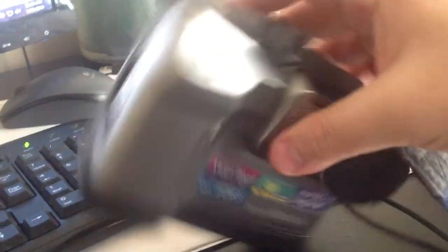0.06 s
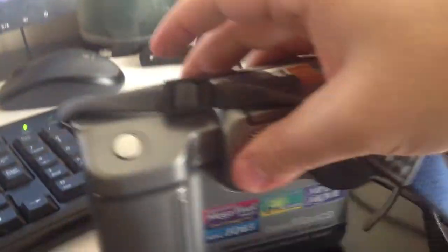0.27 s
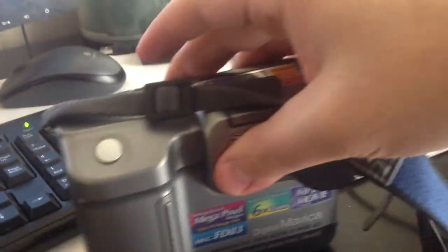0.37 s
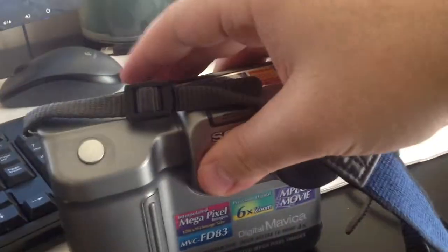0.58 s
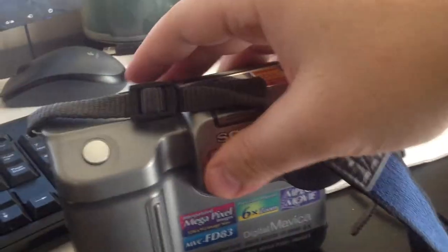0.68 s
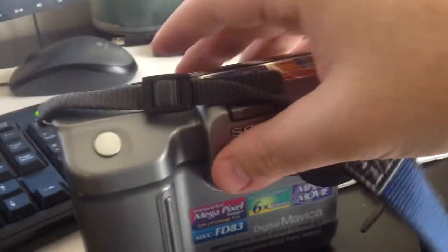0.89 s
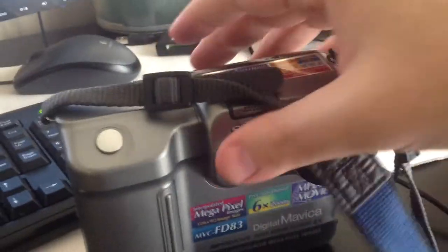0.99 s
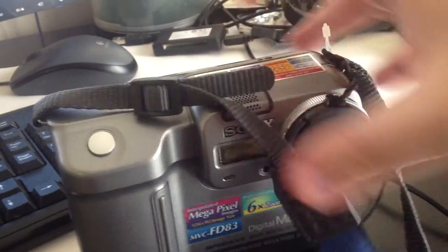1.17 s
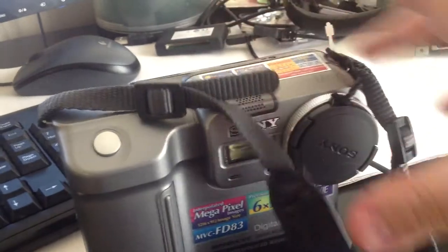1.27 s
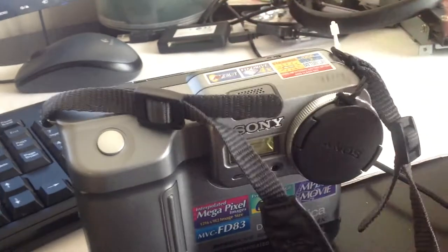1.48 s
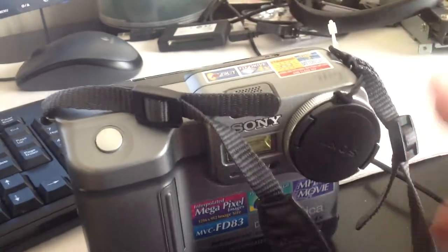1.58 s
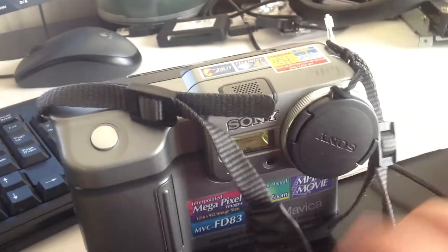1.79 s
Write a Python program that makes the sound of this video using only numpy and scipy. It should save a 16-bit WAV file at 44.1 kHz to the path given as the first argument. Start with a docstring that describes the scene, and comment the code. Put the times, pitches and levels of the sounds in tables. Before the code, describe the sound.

Sharp knocks of a plastic camera set on a desk, followed by faint buckle ticks.

```python
"""A small plastic camera is set down on a desk in a quiet room, close to the microphone.
It brushes the desk, lands with a sharp knock, rocks onto its other edge and settles.
Each contact cracks and rings the case; the desk top booms under each blow.
Strap and buckles then tick faintly against the case as the hand lets go.
Behind it: a fading hiss, a short room echo, steady room noise and a faint hum."""
import sys
import numpy as np
from scipy import signal
from scipy.fft import rfft, irfft
from scipy.io import wavfile
from scipy.ndimage import uniform_filter1d

SR = 44100
rng = np.random.default_rng(int(sys.argv[2]) if len(sys.argv) > 2 else 0)


def wav_out(sig):
    """Save sig, one row per channel (or a flat mono array), as 16-bit PCM at SR to the path in sys.argv[1]."""
    wavfile.write(sys.argv[1], SR, np.round(np.clip(np.atleast_2d(sig).T, -1, 1) * 32767).astype(np.int16))


N = 81585

# Spectrum of a hard contact on the case: freq_hz, gain_db
CRACK_SPECTRUM = [(100, -39.5), (500, -4.5), (1000, 3), (2000, 4), (2700, 5), (3800, 1), (6000, 2.5),
                  (11000, 2), (13000, -3.5), (15000, 0.5)]


def amp(db):
    """Decibels to gain."""
    return 10 ** (np.asarray(db) / 20)


def unit(x):
    """Scale to rms 1."""
    return x / np.sqrt(np.mean(x ** 2) + 1e-20)


def read(points, hz):
    """Interpolate (freq_hz, value) rows on a log-frequency axis."""
    freq_hz, value = np.transpose(points)
    return np.interp(np.log(hz + 1), np.log(freq_hz + 1), value)


def fade(t, t60_s):
    """Exponential decay, 60 dB in t60_s."""
    return np.exp(-np.log(1000) * t / t60_s)


def add(mix, start_s, sound):
    """Mix a sound in at start_s."""
    part = mix[max(round(start_s * SR), 0):][:len(sound)]
    part += sound[:len(part)]


def noise(spectrum, size, tilt_db_per_oct=0):
    """Shaped noise of rms 1; the tilt acts above 1 kHz."""
    hz = np.fft.rfftfreq(size, 1 / SR)
    gain_db = read(spectrum, hz) + tilt_db_per_oct * np.log2(np.maximum(hz, 1000))
    return unit(irfft(rfft(rng.standard_normal(size)) * amp(gain_db), size))


def tint(x, spectrum, size=1024):
    """Minimum-phase filter with the given spectrum."""
    hz = abs(np.fft.fftfreq(size, 1 / SR))
    log_gain = np.log(amp(read(spectrum, hz)))
    taps = np.fft.ifft(np.exp(np.conj(signal.hilbert(log_gain)))).real
    return signal.fftconvolve(x, taps[:size // 2])[:len(x)]


def ring(modes, t, ratio=1):
    """Decaying modes of a struck body; with ratio < 0, neighbours swing against each other."""
    return sum(ratio ** k * amp(db) * fade(t, t60_s) * np.cos(2 * np.pi * hz * t)
               for k, (hz, db, t60_s) in enumerate(modes))


def room_tone(noise_db=-57):
    """Steady room noise and the faint hum of desk equipment."""
    # Room noise spectrum: freq_hz, gain_db
    spectrum = [(30, -9.5), (90, -11), (150, -9), (190, -3.5), (300, -4.5), (650, -15.5), (2900, -28.5),
                (4100, -30.5), (7600, -31), (12600, -32), (15500, -33.5)]
    # Hum tones: pitch_hz, level_db
    tones = [(120, -67), (150, -63.5)]
    t = np.arange(N) / SR
    hum = sum(amp(db) * np.sqrt(2) * np.sin(2 * np.pi * (hz * t + rng.random())) for hz, db in tones)
    return amp(noise_db) * noise(spectrum, N) + hum


def room_echo(x, delay_s=0.00337, build_s=0.0034):
    """Diffuse echo; each band decays at its own rate."""
    # Echo bands: freq_hz, level_db, t60_s
    bands = np.array([(99.4, -15, 1), (213, 0, 0.49), (400, 4.5, 0.49), (800, 1.5, 0.57), (2000, -7, 0.67),
                      (5000, -6, 0.61), (10000, -15, 0.6), (15500, -12, 0.31)])
    hz, frame_s, spectra = signal.stft(rng.standard_normal(SR), SR, nperseg=512)
    level_db = read(bands[:, [0, 1]], hz)[:, None]
    t60_s = read(bands[:, [0, 2]], hz)[:, None]
    energy_norm = np.sqrt(2 * np.log(1000) / (t60_s * SR))
    tail = signal.istft(spectra * amp(level_db) * fade(frame_s, t60_s) * energy_norm, SR)[1][:SR]
    onset = np.clip((np.arange(SR) / SR - delay_s) / build_s, 0, 1)
    return signal.fftconvolve(x, tail * onset)[:N]


def low_swell(peak_s=1.438, width_s=0.16, level_db=-56):
    """Soft low noise rises and sinks once while the hand draws away."""
    # Swell spectrum: freq_hz, gain_db
    spectrum = [(100, -13), (220, -13), (310, 4), (450, -10), (800, -24.5), (3000, -48), (15000, -57)]
    envelope = np.exp(-((np.arange(N) / SR - peak_s) / width_s) ** 2)
    return amp(level_db) * noise(spectrum, N) * envelope


def opening_hiss(hold_s=0.08, decay_s=0.1, level_db=-57):
    """A soft hiss at the start holds briefly, then fades into the room noise."""
    # Hiss spectrum: freq_hz, gain_db
    spectrum = [(60, -50), (200, 4.5), (600, -1), (1500, 3.5), (4000, -3), (10000, -4), (16000, -4)]
    envelope = np.exp(-np.maximum(np.arange(N) / SR - hold_s, 0) / decay_s)
    return amp(level_db) * noise(spectrum, N) * envelope


def rubs(rise_s=0.003, grain_depth=0.4):
    """Short, grainy friction of hand, case and strap."""
    # Friction strokes: start_s, length_s, level_db, tilt_db_per_oct
    strokes = [(.062, 0.033, -47, -11.5), (0.109, 0.048, -48.5, -5.5), (0.188, 0.075, -50, -2.5),
               (0.929, 0.093, -67.5, 0.5), (1.642, 0.079, -61, 6)]
    # Friction spectrum: freq_hz, gain_db
    spectrum = [(100, -19), (350, 4.5), (600, 5.5), (1050, 5.5), (1600, 1.5), (3000, 1.5), (6000, 0.5),
                (12000, 1.5), (16000, -10.5)]
    out, t = np.zeros(N), np.arange(SR // 5) / SR
    for start_s, length_s, level_db, tilt_db_per_oct in strokes:
        envelope = np.minimum(t / rise_s, 1) * np.maximum(1 - (t / length_s) ** 2, 0)
        roughness = unit(uniform_filter1d(rng.standard_normal(len(t)), size=90))
        friction = np.exp(grain_depth * roughness) * noise(spectrum, len(t), tilt_db_per_oct)
        add(out, start_s, amp(level_db) * envelope * unit(friction))
    return out


def buckle(start_s=1.0762, snap_db=-44.5, ring_db=-43.5):
    """A strap buckle snaps against the case and rings."""
    # Buckle modes: pitch_hz, gain_db, t60_s
    modes = [(3870, 0.5, 0.017), (4330, 2, .012), (4830, -2, .01), (5400, -3, 0.0085), (6450, -1.5, .012),
             (8400, -13, 0.0094), (9100, -33, .013), (12950, 1, 0.013)]
    out, t = np.zeros(N), np.arange(SR // 10) / SR
    snap = amp(snap_db) * noise(CRACK_SPECTRUM, len(t)) * fade(t, t60_s=0.016)
    add(out, start_s, snap + amp(ring_db) * ring(modes, t, ratio=-1.026))
    return out


def desk_boom(rise_s=0.002, wash_db=-25.5, wash_rise_s=0.015):
    """The camera's weight drives the desk top, which booms into the room; longer contact is duller."""
    # Blows on the desk: start_s, gain_db, contact_s
    blows = [(0.0634, -22.5, 0.0042), (.1853, -14, .0036), (.2435, 0, .001), (.2995, -13, .001),
             (.371, -6.5, .0023), (0.7666, -28, 0.0034)]
    # Desk top modes: pitch_hz, gain_db, t60_s
    modes = [(153.3, -30.5, .14), (213.3, -22, .16), (234.8, -15, .25), (287.7, -20, .13),
             (394, -22.5, .22), (444.4, -30.5, 0.27), (593, -26, 0.059), (738, -29.5, 0.088),
             (844, -31, .08), (1030, -26, 0.072), (1230, -18.5, 0.042), (1530, -24, .03)]
    # Room wash after a blow: freq_hz, gain_db
    wash_spectrum = [(60, -40), (110, -13.5), (160, -7), (230, -0.5), (300, -1), (370, 5.5), (450, -0.5),
                     (520, -9.5), (1000, -13.5), (1500, -27), (4000, -45)]
    out, t = np.zeros(N), np.arange(SR) / SR
    boom = ring(modes, t) * (1 - np.exp(-t / rise_s))
    wash_envelope = fade(t, t60_s=0.68) * np.minimum(t / wash_rise_s, 1)
    for start_s, gain_db, contact_s in blows:
        force = np.sin(np.pi * np.minimum(t / contact_s, 1)) ** 2
        wash = amp(wash_db) * noise(wash_spectrum, len(t)) * wash_envelope
        response = signal.fftconvolve(boom + wash, force / force.sum())[:len(t)]
        add(out, start_s, amp(gain_db) * response)
    return out


def case_echo(directions=4):
    """The case cracks differently in each direction; the room blends these but gets little of its ring."""
    echoes = sum(room_echo(case_clicks(ring_share_db=-9)) for _ in range(directions))
    return echoes / np.sqrt(directions)


def case_clicks(ring_share_db=0, crack_db=-4.5, rattle_db=-21.5):
    """Each hard contact cracks, rings the plastic case and briefly rattles its loose parts."""
    # Contacts of case and strap fittings: start_s, mid_db, high_db, top_db, crack_t60_s, ring_db
    contacts = [(0.0625, -42.5, -46, -54, 0.02, -20), (0.156, -43, -47, -49, 0.017, -7),
                (.1835, -27, -54, -39, 0.013, -7), (0.2416, -9, -6.5, -3, 0.0072, 0),
                (.37, -9.5, -14.5, -7, 0.0022, 9), (0.3824, -22.5, -24, -24, 0.0031, 7),
                (.568, -58, -51, -41.5, 0.018, -11), (0.6173, -51, -43, -38.5, 0.0051, -4),
                (0.7632, -32, -40, -38.5, 0.0039, 10), (.882, -37, -77, -68, 0.011, -2),
                (1.122, -43.5, -55, -63, 0.037, 10.5), (1.738, -49, -41, -35, 0.0032, 3)]
    # Contact bands: mid_hz, high_hz, top_hz
    bands_hz = [1500, 5000, 11000]
    # Case modes: pitch_hz, gain_db, t60_s
    modes = [(960, -29, .028), (1310, -25.5, 0.018), (1643, -21, .016), (1900, -17.5, 0.014),
             (2347, -32, .012), (2956, -18, 0.018), (6170, -23, 0.013), (9040, -11, 0.0028),
             (11330, -34, 0.0042)]
    out, t = np.zeros(N), np.arange(SR // 10) / SR
    for start_s, *bands_db, crack_t60_s, ring_db in contacts:
        envelope = amp(crack_db) * fade(t, crack_t60_s) + amp(rattle_db) * fade(t, t60_s=0.04)
        burst = tint(rng.choice([-1, 1], len(t)) * envelope, CRACK_SPECTRUM)
        ringing = amp(ring_db + ring_share_db) * ring(modes, t, ratio=-0.98)
        add(out, start_s, tint(burst + ringing, list(zip(bands_hz, bands_db))))
    return out


def scene():
    """Mono mix of camera, desk, handling and room."""
    soft_noise = opening_hiss() + rubs()
    impacts = case_clicks() + case_echo() + desk_boom()
    return (impacts + soft_noise + room_echo(soft_noise) + buckle() + room_tone() + low_swell())[None]


def record(dry, low_cut_hz=104, high_cut_hz=15500):
    """The microphone's steep bass cut, then the band limit."""
    highpass = signal.butter(6, low_cut_hz, "high", fs=SR, output="sos")
    lowpass = signal.firwin(401, high_cut_hz, window=("kaiser", 8), fs=SR)
    return signal.oaconvolve(signal.sosfilt(highpass, dry), lowpass[None], "same")


dry = scene()
out = record(dry)
wav_out(out)
```